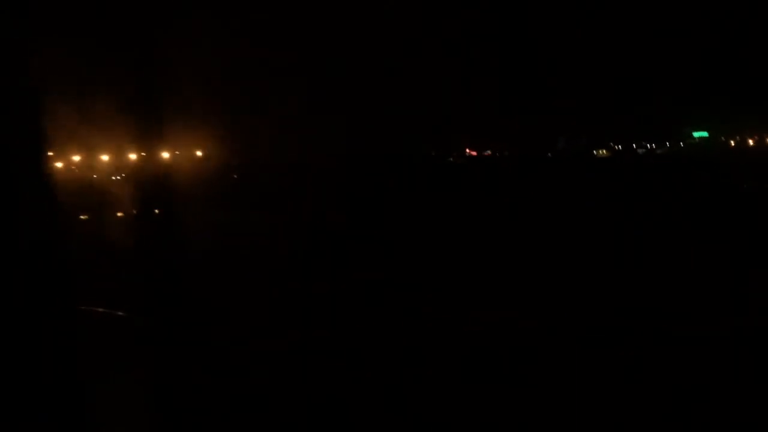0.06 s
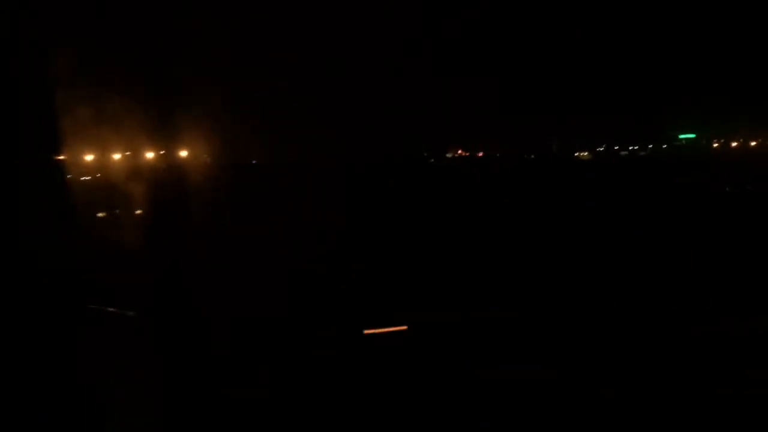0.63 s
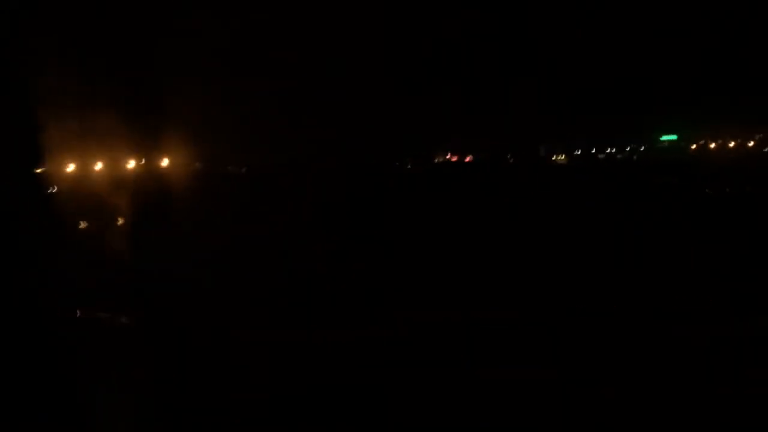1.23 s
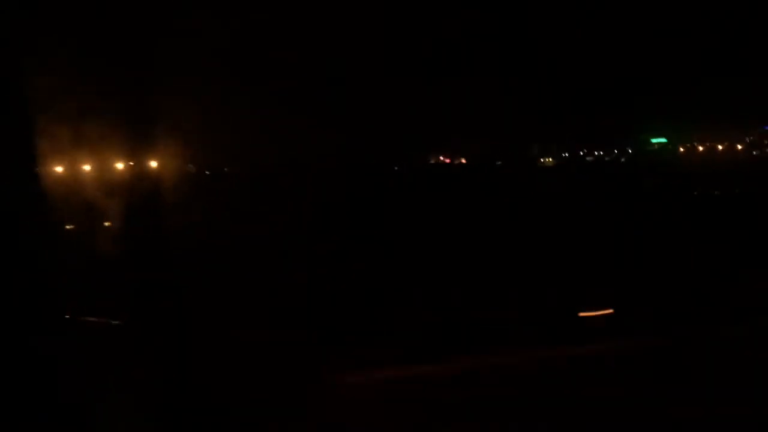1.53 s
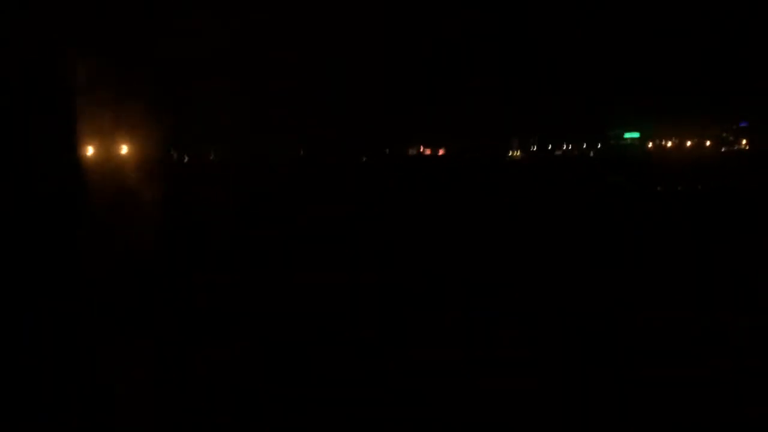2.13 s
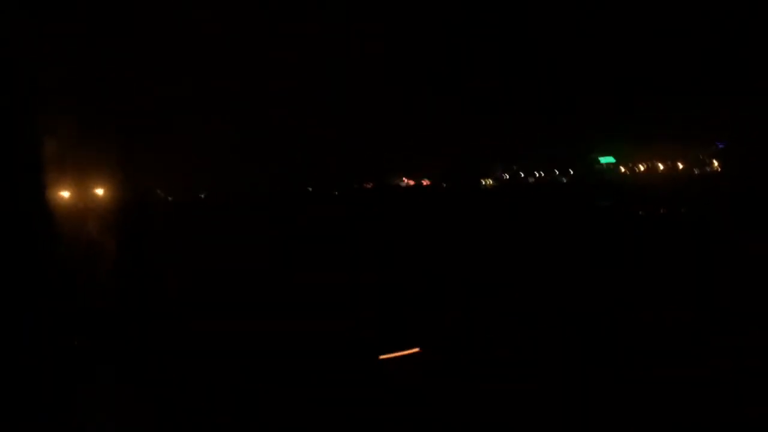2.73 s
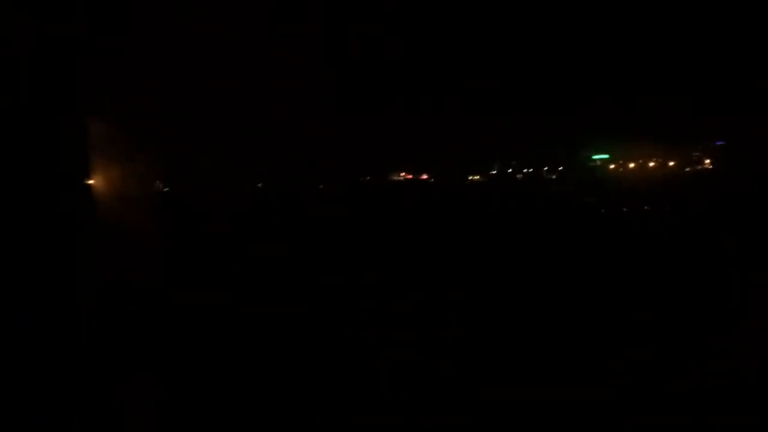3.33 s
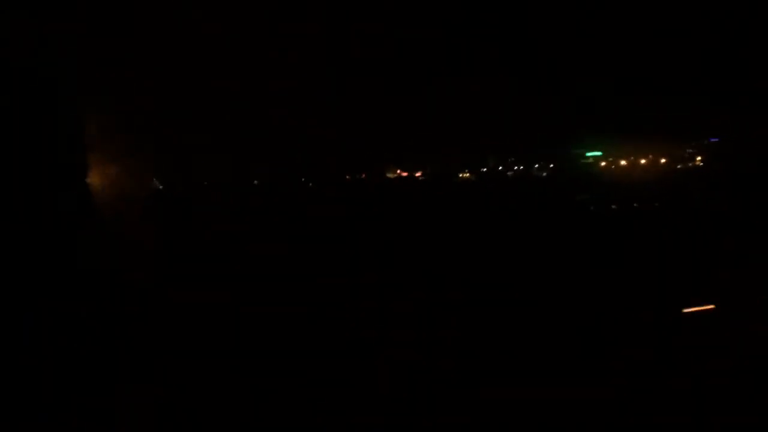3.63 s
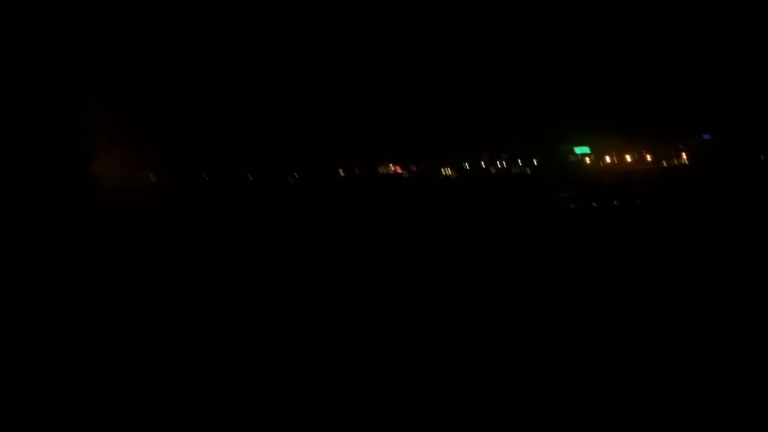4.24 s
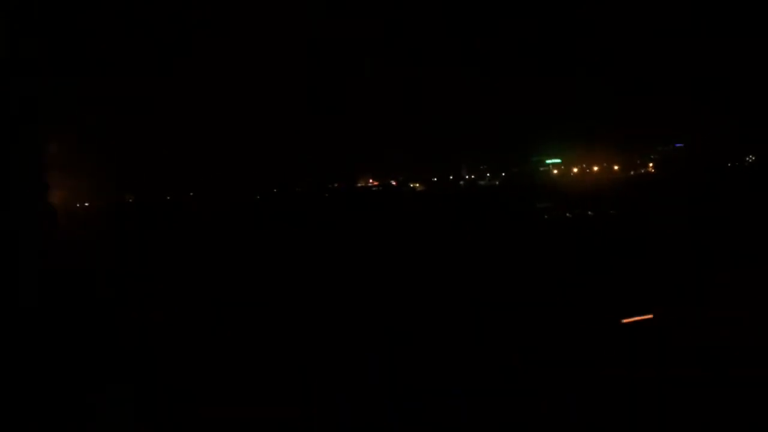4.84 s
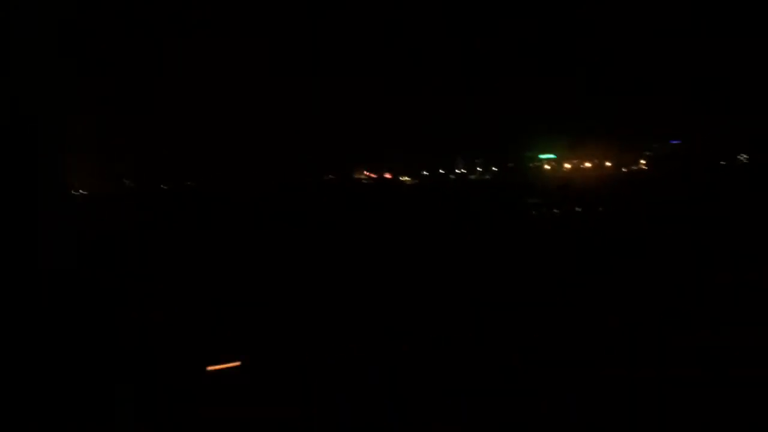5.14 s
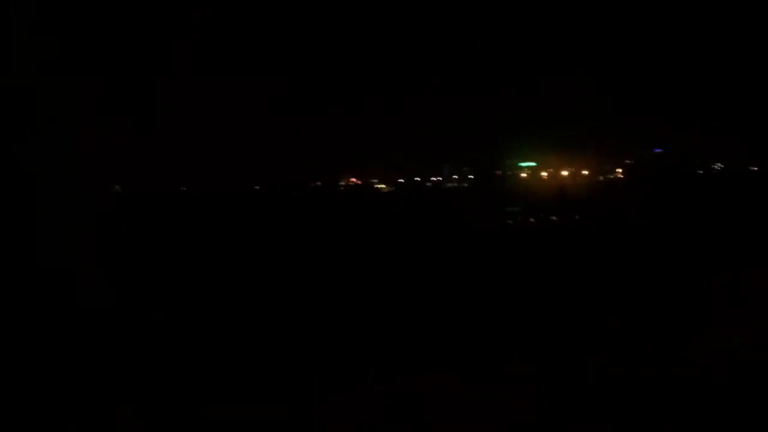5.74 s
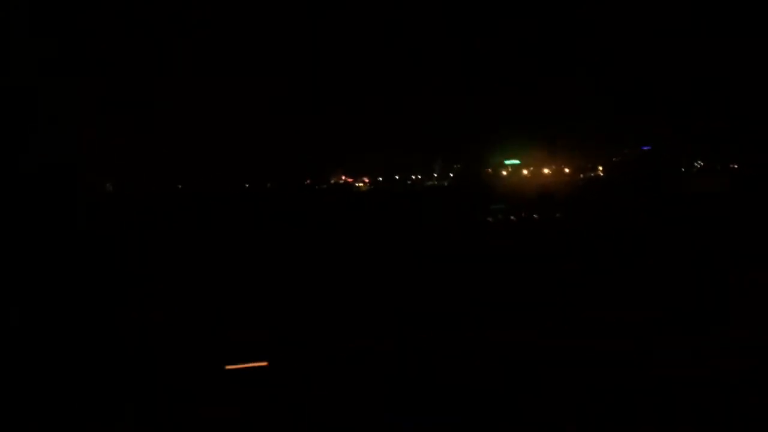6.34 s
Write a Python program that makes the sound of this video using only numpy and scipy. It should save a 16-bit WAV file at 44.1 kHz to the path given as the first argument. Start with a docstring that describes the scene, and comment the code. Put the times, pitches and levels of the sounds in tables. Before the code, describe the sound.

Inside an airliner cabin just after touchdown, the wheels send a heavy, throbbing rumble through the hull. The engines build in reverse thrust to a dull, steady roar, and a wavering fan tone emerges and creeps slightly upward. Air hisses along the hull, while loose trim rattles and ticks lightly and equipment whines faintly. One microphone picks it all up from a window seat.

```python
"""Inside an airliner cabin on the landing rollout, one microphone at a window seat.
From underfoot the wheels shake the hull, whose low modes rumble, boom and throb.
Beyond the wall the engines swell in reverse thrust: a dull roar with a fan tone that creeps upward.
Air hisses along the hull; in the cabin, loose trim rattles and ticks and equipment whines faintly."""
import sys
import numpy as np
from scipy import signal
from scipy.fft import rfft, irfft
from scipy.io import wavfile
from scipy.ndimage import uniform_filter1d, minimum_filter1d

SR = 44100
rng = np.random.default_rng(int(sys.argv[2]) if len(sys.argv) > 2 else 0)


def unload_wav(signal):
    """Save mono or channel-first audio to the path in sys.argv[1] as 16-bit WAV at rate SR, clipped to [-1, 1]."""
    wavfile.write(
        sys.argv[1],
        SR,
        np.round(np.clip(np.atleast_2d(signal).T, -1, 1) * 32767).astype(np.int16),
    )


N = 285327
TIME, FREQS = np.arange(N) / SR, np.fft.rfftfreq(N, 1 / SR)

# reverse thrust builds, holds and eases a little: (time [s], level re full thrust [dB])
THRUST = [(0, -5.5), (.3, -3.5), (.7, -2.5), (1.5, -0.63), (2.3, -0.9), (3.1, 0), (4.2, -0.55), (5.1, -.5),
          (6.47, -0.7)]


def from_db(db):
    """Decibels to gain."""
    return 10 ** (np.asarray(db) / 20)


def unit(x):
    """Scales to an rms of one."""
    return x / np.sqrt(np.mean(x ** 2) + 1e-20)


def follow(rows):
    """The columns of a curve table, at every sample."""
    times, *columns = np.transpose(rows)
    return [np.interp(TIME, times, column) for column in columns]


def dips(rows, seconds):
    """A gain that sinks briefly at each of the given moments."""
    return from_db(sum(db * np.exp(-((TIME - s) / seconds) ** 2) for s, db in rows))


def colour(points):
    """Gain at every frequency from a short spectrum that falls away below its first point."""
    hz, db = np.transpose(points)
    low_cut = np.minimum(FREQS / hz[0], 1) ** 2
    return from_db(np.interp(np.log(FREQS + 1), np.log(hz), db)) * low_cut


def resonances(modes):
    """Gain at every frequency from steep-sided resonances whose powers add."""
    gains = (from_db(db) / (1 + (np.sqrt(2) - 1) * (2 * (FREQS - hz) / width) ** 2)
             for hz, width, db in modes)
    return np.sqrt(sum(gain ** 2 for gain in gains))


def reflections(ripple_db=1.1):
    """Gain at every frequency: small peaks and dips from the cabin's dense, random reflections."""
    return from_db(ripple_db * unit(uniform_filter1d(rng.standard_normal(len(FREQS)), size=360)))


def noise(gain):
    """Noise of unit rms with the given colour."""
    return unit(irfft(rfft(rng.standard_normal(N)) * gain, N))


def wander(rate_hz):
    """Slow random drift of unit rms that never strays far."""
    return unit(np.tanh(noise(1 / (1 + (FREQS / rate_hz) ** 4)) / 2.3))


def steadied(x, seconds):
    """Takes the slow swells out of a noise and leaves its fast beating."""
    window = signal.windows.hann(int(seconds * SR))
    power = signal.fftconvolve(x ** 2, window, "same") / signal.fftconvolve(np.ones(N), window, "same")
    return x / np.sqrt(abs(power) + 1e-9)


def tone(hz):
    """A sine of unit rms that follows a pitch curve."""
    return np.sqrt(2) * np.sin(2 * np.pi * np.cumsum(hz) / SR)


def wheels():
    """Underfoot, the runway drives modes that beat and throb; the higher ones swell with the thrust."""
    # modes, each: (frequency [Hz], width [Hz], relative level [dB])
    hull_modes = [(30, 16, -15.5), (44, 12, -13), (55.6, 21, 9)]  # the whole hull flexing
    floor_modes = [(70, 5.3, -12), (87.7, 20, -4.5), (105, 11, -4.5), (123.6, 8.9, -3.5), (140, 13, -6.5)]  # the floor above the landing gear
    cabin_modes = [(165.2, 6.8, -6), (184.3, 15, -1.5), (194.8, 23, -3), (229, 22, -16.5)]  # the cabin air
    panel_modes = [(251.7, 40, -1.5), (289, 26, -1), (330.8, 25.2, -1.5)]  # the wall panels
    fitting_modes = [(383.5, 36, 1.5), (437, 66, 0.5), (483.6, 39, -3.5), (530, 47, -5.5)]  # smaller, stiffer fittings
    # heaving of the hull and shaking of the floor: (time [s], relative level [dB])
    hull_heave = [(0, -27), (.5, -22.5), (1.0, -27), (1.7, -20), (2.4, -29), (2.8, -25.5), (3.3, -35),
                  (3.65, -24), (4.1, -22.5), (4.45, -25.5), (4.9, -31), (5.2, -22.5), (5.55, -40.5),
                  (5.9, -24), (6.2, -29), (6.47, -27)]
    floor_shake = [(0, -18.5), (.3, -23), (.9, -17), (1.85, -16), (2.9, -18.5), (3.6, -16.5), (4.2, -18),
                   (4.8, -16.5), (5.95, -18), (6.2, -21.5), (6.47, -14)]
    # brief moments where the low rumble sinks: (time [s], gain [dB])
    rumble_dips = [(.78, -0.5), (1.34, -6), (2.68, -6.5), (3.82, -9), (4.41, -1), (4.65, -2.5), (5.11, -6),
                   (5.70, -3), (6.2, -8)]
    (heave_db,), (shake_db,), (thrust_db,) = map(follow, (hull_heave, floor_shake, THRUST))
    waver = from_db(2 * wander(rate_hz=13))  # hull, floor and cabin air waver in level together
    heave = from_db(heave_db - 2) * steadied(waver * noise(resonances(hull_modes)), seconds=.54)
    shake = from_db(shake_db + 2.17) * dips(rumble_dips, seconds=.033)
    rumble = shake * steadied(waver * noise(resonances(floor_modes)), seconds=.15)
    cabin_air = steadied(waver * noise(resonances(cabin_modes)), seconds=.24)
    boom = from_db(-18 + 1.22 * thrust_db) * cabin_air
    drone = from_db(-23 + 1.37 * thrust_db) * steadied(noise(resonances(panel_modes)), seconds=.89)
    hum = from_db(-29 + thrust_db) * steadied(noise(resonances(fitting_modes)), seconds=.87)
    return heave + rumble + boom + drone + hum


def engines(sway_hz=2.0, flutter_db=1.7):
    """Beyond the wall, a turbulent roar, a hollow ring and a fan tone fluttering in disturbed inflow."""
    # the roar as heard through the wall: (frequency [Hz], relative level [dB])
    roar_spectrum = [(400, -15.5), (585, 1), (660, -2), (695, -1), (745, -5), (800, -3.5), (860, -3.5),
                     (965, -3.5), (1050, -7.5), (1250, -8.5), (1550, -12.5), (2150, -24), (2700, -26.5),
                     (7000, -68.5)]
    # the duct's ring, heard near full thrust: (frequency [Hz], width [Hz], relative level [dB])
    duct_modes = [(970, 180, 0)]
    # the fan tone: (time [s], pitch [Hz], relative level [dB])
    fan_curve = [(0, 545, -52), (1.3, 551, -46), (1.9, 553, -41), (2.25, 555.5, -36.5), (2.47, 553.5, -31),
                 (2.62, 554, -37), (2.8, 557.5, -34.5), (3.05, 560.5, -33), (3.8, 563.5, -32),
                 (4.2, 565, -32), (4.6, 566, -34.5), (5.02, 568, -33.5), (5.2, 561, -35), (5.32, 568, -38),
                 (5.62, 563.5, -31), (5.8, 570, -41), (6.0, 568, -46), (6.15, 568, -39), (6.47, 568, -36.5)]
    (thrust_db,), (fan_hz, fan_db) = follow(THRUST), follow(fan_curve)
    roar_gain = from_db(-33 + thrust_db + .53 * wander(rate_hz=15))
    roar = roar_gain * noise(colour(roar_spectrum) * reflections())
    fan = tone(fan_hz + sway_hz * wander(rate_hz=14.5))
    fan *= from_db(fan_db - 1.1 + flutter_db * wander(rate_hz=13))
    duct = from_db(-45.5 + 3 * thrust_db) * noise(resonances(duct_modes))
    return roar + duct + fan


def airflow(band_width_hz=940):
    """Air hisses along the hull; a narrower band joins and sinks in pitch as the thrust builds."""
    # rushing air: (time [s], broad hiss level [dB], narrow band level [dB], band centre [Hz])
    rush = [(0, -45.5, -71, 5900), (.28, -51.5, -68, 5610), (.55, -46.5, -71, 5300),
            (1.1, -48, -64.5, 5084), (1.4, -46, -62, 5000), (1.75, -46, -67, 4800), (2.1, -45.5, -70, 4200),
            (2.55, -49, -57, 3808), (3.1, -48.5, -56.5, 3744), (4.3, -47, -60, 3932), (4.9, -48, -58, 3870),
            (6.0, -49, -57.5, 3835), (6.47, -48, -56, 3814)]
    # the broad hiss: (frequency [Hz], relative level [dB])
    hiss_spectrum = [(1100, 2), (1700, 16), (2150, 15), (2600, 5.5), (3200, 4), (4000, -0.5), (5000, -1),
                     (6300, -4), (7300, -9.5), (9000, -12.5), (12000, -21.5), (15300, -27.5)]
    broad_db, band_db, band_hz = follow(rush)
    broad = from_db(broad_db + 1.3 * wander(rate_hz=17)) * noise(colour(hiss_spectrum) * reflections())
    # low noise, shifted up to the band's gliding centre
    low_pass = resonances([(0, band_width_hz, 0)])
    phase = 2 * np.pi * np.cumsum(band_hz) / SR
    band = unit(noise(low_pass) * np.cos(phase) + noise(low_pass) * np.sin(phase))
    return broad + from_db(band_db + .69 * wander(rate_hz=18)) * band


def trim_rattle(contacts_per_s=450, ring_s=.002, fade_s=.025, rest_db=-69):
    """Loose trim chatters in clumps of tiny, quickly damped contacts, harder during each fit."""
    # fits of rattling: (start [s], length [s], level [dB])
    fits = [(0, .19, -65), (0.367, .31, -63.5), (0.756, 0.19, -64), (1.222, 0.13, -66), (1.41, .17, -69),
            (1.72, .14, -73), (2.85, 0.22, -65), (4.98, .06, -61), (5.197, .13, -63), (5.42, 0.42, -65.5),
            (5.89, 0.071, -62), (6.2, 0.47, -64)]
    # the ring of the trim: (frequency [Hz], relative level [dB])
    trim_spectrum = [(2000, -17), (4000, -3.5), (6000, 7), (8000, 0.5), (10000, -3.5), (12000, -10),
                     (15300, -18)]
    level = np.full(N, from_db(rest_db))
    for start, length, db in fits:
        gate = np.clip(np.minimum(TIME - start, start + length - TIME) / fade_s, 0, 1)
        level = np.maximum(level, from_db(db) * gate)
    contacts = rng.random(N) < contacts_per_s / SR
    strength = from_db(-.7 * np.minimum(rng.exponential(1, N), 4))
    energy = signal.lfilter([1], [1, -np.exp(-2 / (ring_s * SR))], (contacts * strength) ** 2)
    chatter = np.sqrt(energy) * noise(colour(trim_spectrum))
    return level * unit(chatter * from_db(.6 * wander(rate_hz=25)))


def equipment(sway_hz=1.5):
    """Cabin equipment gives thin, wavering whines that recede as the engines swell."""
    # whines: (pitch [Hz], level at full thrust [dB], change with thrust [dB per dB])
    whines = [(4802, -79.7, -1.7), (5102, -79, -1.2), (11850, -100, -1)]
    thrust_db, = follow(THRUST)
    out = np.zeros(N)
    for hz, db, slope in whines:
        whine = tone(hz + sway_hz * wander(rate_hz=8))
        out += from_db(db + slope * thrust_db + wander(rate_hz=5)) * whine
    return out


def rumble_swells(hull_hz=66, cabin_hz=186, panel_hz=272, detune=.069, swell_s=.031):
    """The loudest brief throbs of the low rumble, each sounding at four pitches."""
    # throbs: (time [s], floor pitch [Hz], hull [dB], floor [dB], cabin air [dB], panel [dB])
    throbs = [(0.089, 79.5, -29, -16.5, -27, -30), (.48, 108, -24, -16.5, -31, -38),
              (.71, 105.3, -28, -17, -34, -23.5), (0.851, 104.6, -32, -15.5, -22.5, -36),
              (.95, 110, -42, -14.5, -23, -34), (1.06, 106.5, -32, -16, -23, -41),
              (1.22, 108, -19, -17, -27, -27), (1.454, 142, -30, -29, -12.5, -23.5),
              (1.73, 103, -32, -14, -15.5, -16), (1.779, 104, -22, -9.5, -20, -32),
              (1.932, 110.5, -19, -11.5, -27, -32), (2.14, 115, -18, -13.5, -26, -40),
              (2.26, 109, -30.5, -10.5, -15.5, -30.5), (2.41, 112.5, -19.5, -12, -20.5, -30),
              (2.58, 113, -13, -19, -16.5, -23), (2.76, 106, -27, -11, -15, -40),
              (3.02, 103.4, -36, -15.5, -10, -23), (3.239, 124, -44, -26, -28, -21.5),
              (3.559, 97, -24.5, -12.5, -17, -32), (3.655, 113, -13, -11, -26, -31),
              (3.761, 95, -23, -26, -26, -27.5), (3.969, 101.6, -16, -10.5, -29, -32),
              (4.16, 94.5, -15, -14.5, -26, -29), (4.241, 89, -18, -14.5, -33, -37),
              (4.319, 108, -32, -11.5, -21.5, -19), (4.544, 106, -15, -12, -24.5, -29),
              (4.70, 84.4, -21, -26, -14.5, -45), (4.86, 98, -31, -21, -16.5, -17.5),
              (4.98, 117, -27.5, -13.5, -30, -23), (5.149, 89.5, -14.5, -15, -23, -31.5),
              (5.279, 108, -31, -11.5, -19.5, -37), (5.359, 109, -38, -16, -34, -30.5),
              (5.48, 110, -20, -21, -25, -36), (5.611, 121, -21, -14.5, -13.5, -29),
              (5.85, 112, -17, -15.5, -17.5, -27.5), (5.959, 111.6, -15.5, -9.5, -26, -31),
              (6.06, 105, -17, -19.5, -26, -39)]
    out = np.zeros(N)
    for s, floor_hz, *levels_db in throbs:
        swell = np.exp(-((TIME - s) / swell_s) ** 2)
        near = swell > 1e-4
        pitches = (hull_hz * (1 + detune * rng.uniform(-1, 1)),
                   floor_hz,
                   cabin_hz * (1 + detune * rng.uniform(-1, 1)),
                   panel_hz * (1 + 2 * detune * rng.uniform(-1, 1)))
        for hz, db in zip(pitches, levels_db):
            phase = 2 * np.pi * (hz * (TIME[near] - s) + rng.random())
            out[near] += from_db(db) * swell[near] * np.sqrt(2) * np.sin(phase)
    return out


def trim_ticks(width_hz=3200, rise_s=.006):
    """Now and then a piece of trim slips with a brief bright scrape."""
    # slips: (time [s], band centre [Hz], relative level [dB], decay [s])
    slips = [(.115, 10500, -61, .016), (.145, 7300, -56, .016), (.47, 10000, -62, .022),
             (.638, 11500, -62.5, .02), (.787, 5600, -58, .014), (.872, 5400, -52, .025),
             (.88, 11000, -64, .02), (1.15, 11000, -66, .022), (1.28, 8200, -58, .018),
             (1.44, 8500, -60, .016), (1.55, 11000, -66, .018), (1.67, 10500, -65, .022),
             (1.775, 10000, -60, .02), (1.84, 11000, -66, .014), (2.245, 4900, -47.5, .013),
             (3.025, 5850, -54.5, .031), (3.67, 10500, -65, .014), (4.528, 7500, -58, .012),
             (4.66, 10300, -64, .012), (5.44, 6300, -56, .02), (5.54, 8500, -57, .018),
             (5.895, 8540, -62, .03), (6.425, 7000, -50, 0.027)]
    out = np.zeros(N)
    for s, hz, db, decay_s in slips:
        age = np.maximum(TIME - s, 0)
        envelope = (1 - np.exp(-age / rise_s)) * np.exp(-age / decay_s)
        out += from_db(db) * envelope * noise(resonances([(hz, width_hz, 0)]))
    return out


def scene():
    """Everything as it reaches the microphone at the window seat, in mono."""
    # brief dips in the hiss and rattle: (time [s], gain [dB])
    lulls = [(2.295, -4), (5.864, -6)]
    rumble_and_roar = wheels() + rumble_swells() + engines()
    hiss_and_rattle = dips(lulls, seconds=.0061) * (airflow() + trim_rattle())
    return (rumble_and_roar + hiss_and_rattle + trim_ticks() + equipment())[None]


def record(dry, ceiling=.705, cutoff_hz=15290):
    """After the microphone, a smooth limiter holds the peaks of rumble; then soft ends and a low-pass."""
    gain = np.minimum(1, ceiling / (abs(dry[0]) + 1e-9))
    held = minimum_filter1d(gain, size=801)
    smoothed = uniform_filter1d(uniform_filter1d(held, size=401), size=401)
    ends = signal.windows.tukey(N, .0012)
    low_pass = signal.firwin(1023, cutoff_hz, window=("kaiser", 9), fs=SR)
    return signal.oaconvolve(dry * smoothed * ends, low_pass[None], "same")


dry = scene()
out = record(dry)
unload_wav(out)
```